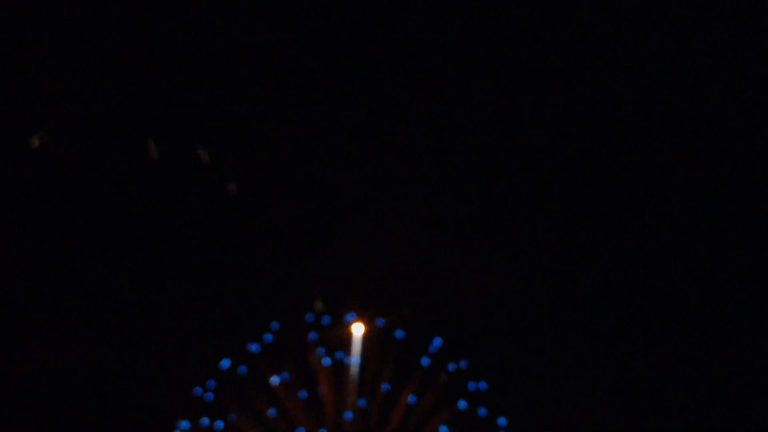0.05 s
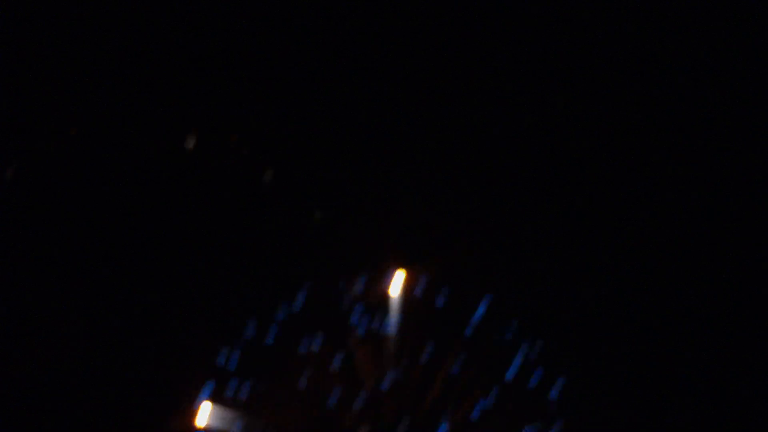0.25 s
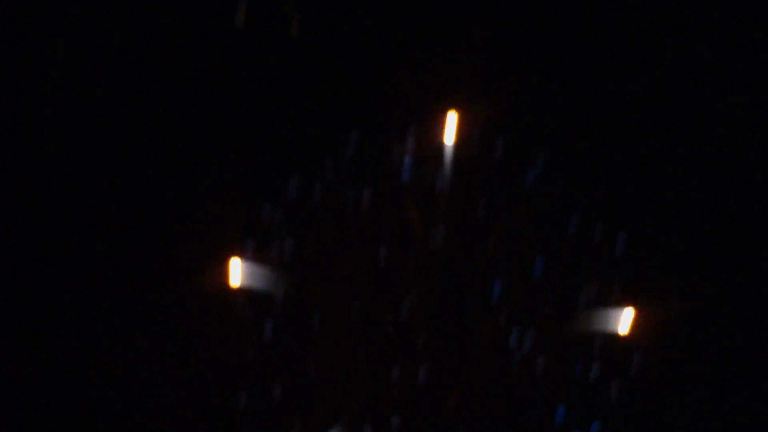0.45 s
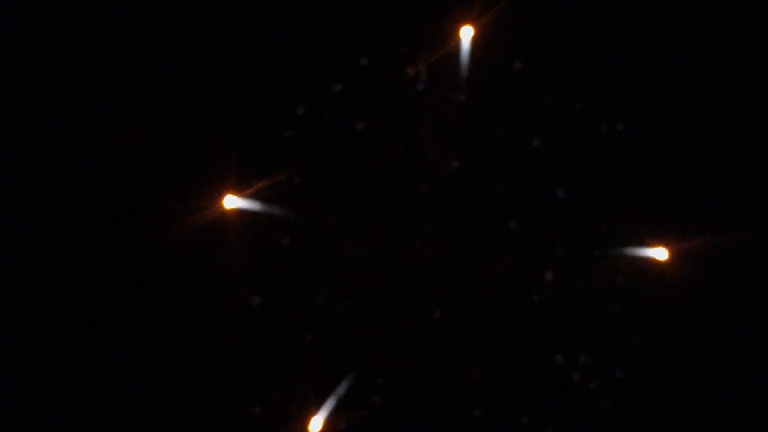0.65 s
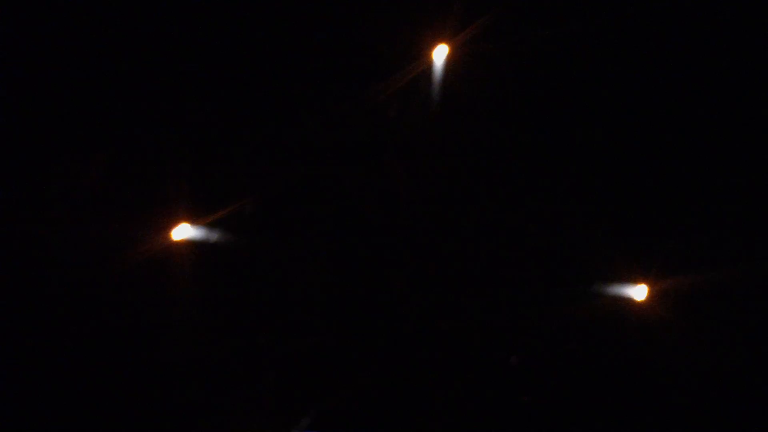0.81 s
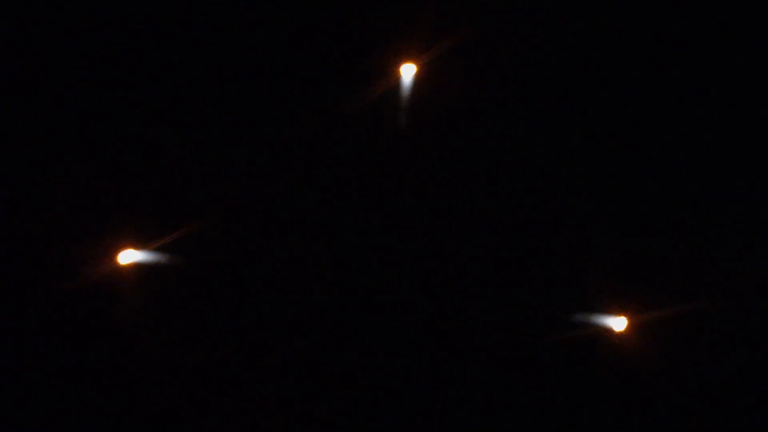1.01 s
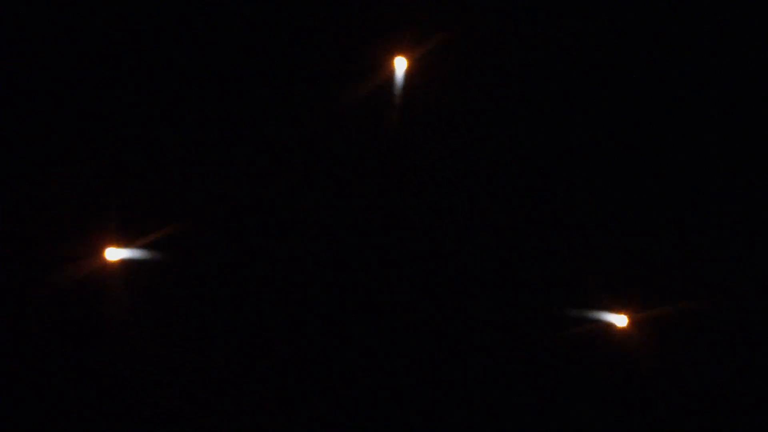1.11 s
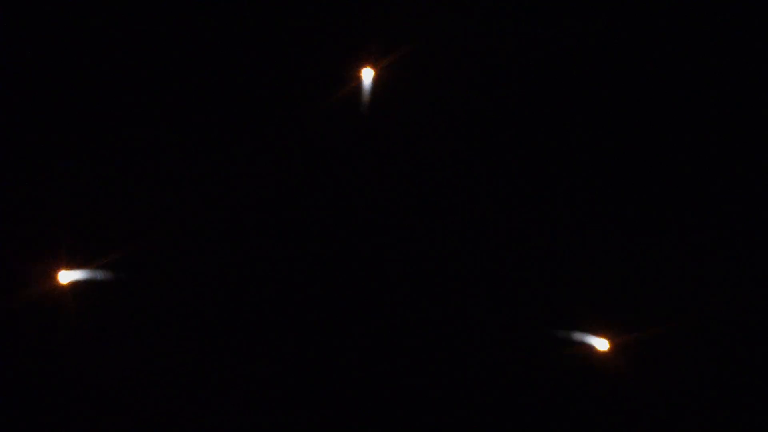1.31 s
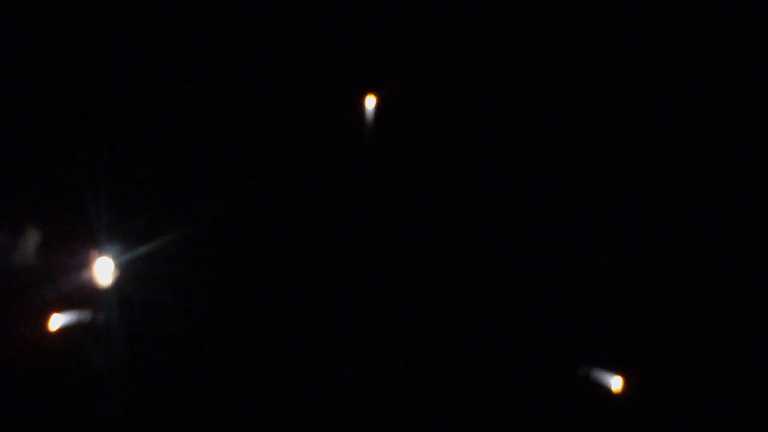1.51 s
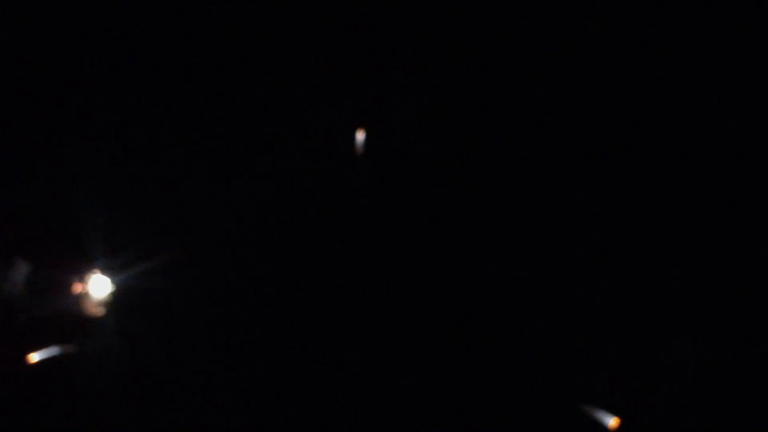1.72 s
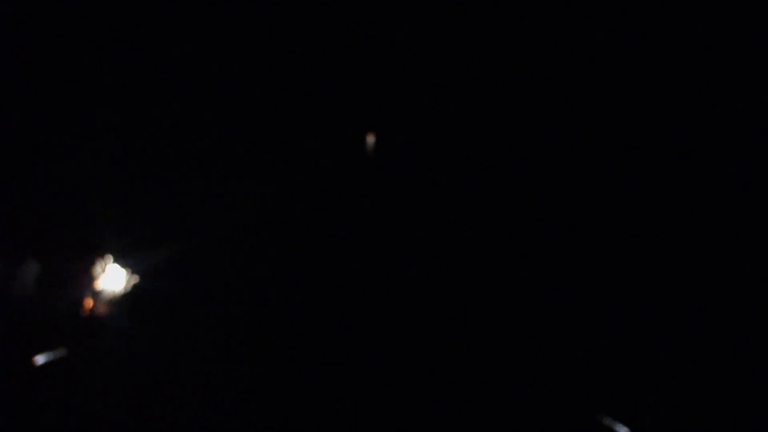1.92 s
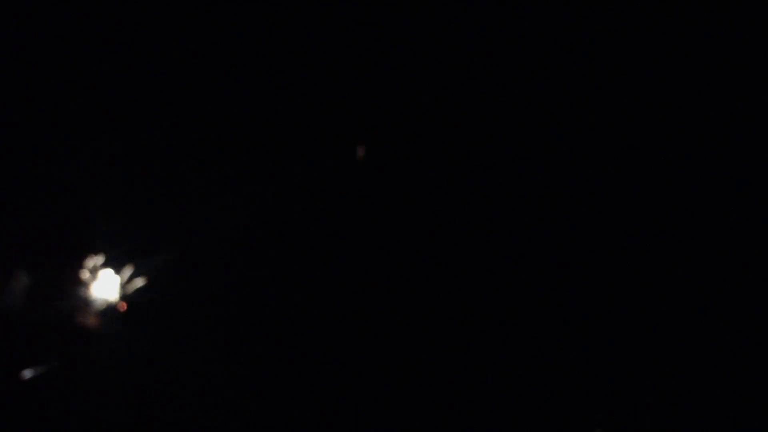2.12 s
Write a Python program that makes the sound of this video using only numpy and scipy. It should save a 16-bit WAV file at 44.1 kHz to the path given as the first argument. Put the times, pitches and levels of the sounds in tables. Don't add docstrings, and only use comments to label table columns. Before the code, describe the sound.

Over a faint fading rumble and thin early whistle, a firework bang slams a small camera microphone outdoors; clattering echoes thin out quickly, leaving overlapping shrill whistles, one buzzing, one wavering, drifting down in pitch.

```python
import sys
import numpy as np
from scipy import signal
from scipy.fft import rfft, irfft, next_fast_len
from scipy.io import wavfile
from scipy.ndimage import uniform_filter1d, map_coordinates

SR = 44100
rng = np.random.default_rng(int(sys.argv[2]) if len(sys.argv) > 2 else 0)


def voltage_ratio(level):
    return 10 ** (np.asarray(level, float) / 20)


def output_pcm(signal):
    pcm = np.clip(np.atleast_2d(signal).T, -1, 1) * 32767
    wavfile.write(sys.argv[1], SR, np.round(pcm).astype(np.int16))


N = 94815

# (time [s], strength [dB])
RETURNS = [
    (0.222, -20),
    (0.29, -18),
    (0.344, -19),
    (0.392, -21.5),
    (0.42, -18.5),
    (0.662, -27.5),
    (1.306, -33),
    (1.478, -37),
    (2.15, -39.5),
]


def unit(x):
    return x / np.sqrt(np.mean(x ** 2) + 1e-20)


def curves(rows):
    s, *cols = np.transpose(rows)
    return [np.interp(np.arange(N) / SR, s, c) for c in cols]


def wobble(rate):
    return map_coordinates(rng.standard_normal(N // 20), [np.arange(N) * rate / SR])


def filtered(x, response):
    m = next_fast_len(len(x) + 8192)
    return irfft(rfft(x, m) * response(np.fft.rfftfreq(m, 1 / SR)), m)[:len(x)]


def dulled(x, hz):
    return filtered(x, lambda f: 1 / (1 + 1j * f / hz) ** 2)


def rush(spectrum, patchy_db):
    z = signal.stft(rng.standard_normal(N), nperseg=512)[2]
    field = uniform_filter1d(rng.standard_normal(z.shape), size=6, axis=0)
    field = uniform_filter1d(field, size=6, axis=1)
    x = signal.istft(z * voltage_ratio(patchy_db * unit(field)), nperseg=512)[1][:N]
    f, db = np.transpose(spectrum)
    return unit(filtered(x, lambda hz: voltage_ratio(np.interp(np.log(hz + 1), np.log(f + 1), db, -120, -120))))


def blow(t, ms):
    u = t * 1000 / ms
    return (1 - u) * np.exp(-u * u / 3)


def night():
    # (frequency [Hz], level [dB per Hz])
    rumble = [(13, -41), (22, -4.5), (71, 3), (167, -27), (855, -19), (3980, -43.5), (5330, -23.5),
              (6480, -42.5), (7500, -69.5), (9750, -114), (16500, -120)]
    start_db, fade_db_per_s = -30.5, 8.5
    level_db = start_db - fade_db_per_s * np.arange(N) / SR + 0.33 * wobble(3.6)
    return voltage_ratio(level_db) * rush(rumble, patchy_db=4.0)


def whistle(rows, flutter_db, bend=0, pulse=1, side_db=0):
    hz, db = curves(rows)
    t = np.arange(N) / SR
    pitch_hz = hz * (1 + bend) + 12 * wobble(18) + 12 * wobble(160)
    turn = 2 * np.pi * np.cumsum(pitch_hz) / SR
    haze_db = -7 - 9 * np.clip(t / 1.3 - .5, 0, 1)
    tone = np.sin(turn) * (1 + voltage_ratio(haze_db) * wobble(900))
    undertone = voltage_ratio(-15) * np.sin(turn / 2)
    overtone = voltage_ratio(-14) * np.clip(t / 1.3, 0, 1) ** 2 * np.sin(turn * 3 / 2)
    tone += voltage_ratio(side_db) * (undertone + overtone)
    tone += voltage_ratio(-25 + 4.2 * wobble(2.9)) * np.sin(2 * turn)
    lit = uniform_filter1d(1. * ((t >= rows[0][0]) & (t <= rows[-1][0])), size=600)
    flutter = flutter_db * (0.5 - 1.44 * np.abs(wobble(21.93))) + 0.57 * wobble(140)
    return np.sqrt(2) * tone * pulse * lit * voltage_ratio(db + flutter)


def stars():
    # (time [s], pitch [Hz], level [dB])
    spinner = [(.36, 5930, -60), (.414, 5844, -41), (.592, 5687, -43), (.66, 5570, -57), (.78, 5370, -52),
               (.85, 5250, -44), (.95, 5150, -43), (1.144, 4815, -41), (1.36, 4429, -40), (1.6, 4145, -42),
               (1.74, 4010, -36), (1.86, 3890, -35.5), (1.95, 3815, -39), (2.15, 3715, -40)]
    tumbler = [(.56, 4660, -56), (.62, 4610, -49), (.68, 4530, -48), (.74, 4470, -41), (.9, 4320, -40),
               (1.0, 4220, -42), (1.2, 4030, -46), (1.33, 3900, -44), (1.4, 3740, -40), (1.6, 3730, -40),
               (1.8, 3645, -43), (2.0, 3555, -45), (2.15, 3490, -42)]
    lowest = [(.53, 4000, -50), (.58, 4135, -40), (.64, 4085, -46), (.67, 4045, -40), (.8, 4025, -42),
              (1.0, 3875, -42), (1.2, 3760, -40), (1.4, 3585, -43), (1.6, 3515, -42), (1.63, 3450, -52),
              (1.69, 3365, -46), (1.85, 3365, -45), (1.95, 3330, -49), (2.02, 3250, -45), (2.15, 3180, -43)]
    middle = [(.55, 4900, -60), (0.588, 4930, -42), (.66, 4940, -43), (0.766, 4830, -48), (.95, 4690, -49),
              (1.05, 4610, -46), (1.17, 4520, -45), (1.34, 4230, -52), (1.451, 4056, -58)]
    early = [(0.018, 5500, -61), (0.118, 5270, -50), (.25, 5230, -43.5), (0.333, 5103, -39.5),
             (0.402, 4893, -41.5), (0.481, 4830, -42), (0.559, 4590, -41.5), (0.601, 4540, -41.5)]
    brief = [
        (.37, 4700, -55),
        (.4, 4640, -39),
        (.46, 4570, -41),
        (.505, 4505, -34),
        (.53, 4480, -55),
    ]
    side_star = [
        (0.359, 5130, -59.5),
        (0.401, 5110, -49.5),
        (.52, 4900, -40.5),
        (.6, 5130, -71.5),
    ]
    high = [
        (0.038, 6130, -76),
        (0.116, 6200, -50.5),
        (0.22, 6090, -54.5),
        (.34, 6060, -43),
    ]
    split = [
        (1.621, 4155, -55),
        (1.66, 4233, -43),
        (1.697, 4187, -48.5),
        (1.761, 4010, -43),
    ]
    pip = [
        (1.385, 630, -60),
        (1.41, 620, -50),
        (1.44, 615, -60),
    ]
    facing = [.51, .63, .745, .86, .97, 1.065, 1.15, 1.24, 1.335, 1.415, 1.495, 1.59, 1.7, 1.82, 1.95, 2.09,
              2.24]
    # (frequency [Hz], level [dB per Hz])
    hiss = [(2500, -22.5), (3300, -16), (4200, -4.5), (4800, -10), (5800, -5), (6500, -10.5), (7200, -14.5),
            (7900, -42)]
    # (time [s], level [dB])
    hiss_swell = [
        (0, -58),
        (.15, -47.5),
        (.35, -38),
        (.9, -50.5),
        (1.4, -49.5),
        (2.15, -52.5),
    ]

    t = np.arange(N) / SR
    spin_hz, spin_depth = 62.5, .5
    spin = unit(1 + spin_depth * np.cos(2 * np.pi * spin_hz * t - 2.2 + .3 * wobble(5)))
    tumble = .015 * np.cos(2 * np.pi * np.interp(t, facing, np.arange(len(facing))))
    sputter = 40 / 4700
    worn = t > 1.62
    tones = whistle(spinner, 1.9, pulse=spin, side_db=-8)
    tones += whistle(tumbler, 2.4, bend=tumble)
    tones += sum(whistle(rows, 3.3, side_db=-7) for rows in (early, brief, side_star, high, split, pip))
    tones += whistle(lowest, 3.3, bend=worn * sputter * wobble(60), side_db=-7)
    tones += whistle(middle, 2.2, bend=sputter * wobble(110), side_db=-7)
    trail = rng.standard_normal(SR // 4) * np.exp(-np.arange(SR // 4) / SR / 0.12)
    tones += voltage_ratio(-18.5) * signal.fftconvolve(tones, trail / np.linalg.norm(trail))[:N]
    return tones + voltage_ratio(curves(hiss_swell)[0]) * rush(hiss, patchy_db=2.5)


def pops():
    count, thinning_s = 90, .3
    when, size = rng.exponential(1, (count, 2)).T
    at = np.minimum(((RETURNS[0][0] + thinning_s * when) * SR).astype(int), N - 1)
    level_db = -5 + 3 * np.minimum(size, 2.2) + curves(RETURNS)[0][at]
    ticks = np.bincount(at, voltage_ratio(level_db), N)
    shape = dulled(blow(np.arange(400) / SR, 0.17), 2400)
    return -signal.fftconvolve(ticks, shape)[:N]


def thumps():
    # (first trough [s], level [dB],
    # pitch [Hz], length [cycles])
    ground_and_hills = [(.2258, 2.5, 214, 0.4), (.2305, -9, 146, 0.65), (.2445, -27, 110, 0.88),
                        (0.2569, -6, 199, 0.58), (.2594, -1, 516, 0.47), (0.2635, -8.5, 500, 0.49),
                        (0.2673, -8, 199, 1.4), (0.276, -14, 150, 1.1), (0.3005, -19, 190, 0.36),
                        (0.318, -6, 178, 0.35), (0.3312, -18, 185, 1.4), (0.3368, -19.5, 156, 0.45),
                        (0.345, -9, 208, 0.2), (0.3585, -18, 200, 0.98), (.372, -16.5, 150, 0.68),
                        (0.4054, -13.5, 122, 0.69), (0.4264, -13, 143, 1), (0.4325, -18, 153, 0.59),
                        (0.4813, -11, 172, 0.47), (0.5175, -10.5, 100, 0.44), (0.5654, -18, 80, 1.36),
                        (.6068, -21, 900, 3.1), (0.8381, -18, 93, 0.73), (1.1489, -29, 150, .7)]
    # (time [s], level [dB], pitch [Hz], length [cycles])
    fences = [
        (.2383, -17, 1700, 2),
        (.259, -19, 6500, 8),
        (.2617, -15, 3100, 4),
        (.2622, -22, 7000, 5),
        (.3455, -19, 2300, 3),
        (.3585, -21, 2500, 3),
        (.3775, -20, 1400, 3),
        (.4205, -21, 2500, 4),
        (.44, -20, 2750, 5),
        (.493, -25, 2400, 4),
    ]
    s, db, hz, cycles = np.transpose(ground_and_hills + fences)[:, :, None]
    u = hz * (np.arange(N // 2 + N // 8) / SR - s) - .3
    swings = voltage_ratio(db - 1) * np.sin(2 * np.pi * u) * np.exp(-(u / cycles) ** 2)
    return np.pad(swings.sum(axis=0), (0, N - u.shape[1]))


def roll():
    # (frequency [Hz], level [dB per Hz])
    boom_colour = [(13, -44), (22, -7.5), (65, 5), (150, 4), (286, -9), (350, -48), (450, -10.5),
                   (580, -50), (990, -120)]
    clatter_colour = [(150, -31.5), (250, -7.5), (351, -8), (698, -8), (849, -4), (1400, -8.5), (1770, -18),
                      (2450, -17), (3400, -24), (4420, -54), (7480, -120)]
    strength_db, = curves(RETURNS)
    top = strength_db.max()
    below_top = strength_db - top
    build_s = .015
    on = np.clip((np.arange(N) / SR - RETURNS[0][0]) / build_s, 0, 1)
    boom = unit(voltage_ratio(1.3 * wobble(30.1)) * rush(boom_colour, patchy_db=0.96))
    boom *= voltage_ratio(-0.5 + 1.167 * below_top)
    grain_db = 0.93 * wobble(90) + 1.3 * wobble(44.0)
    clatter = unit(voltage_ratio(grain_db) * rush(clatter_colour, patchy_db=0.5))
    clatter *= voltage_ratio(-8 + 0.93 * below_top)
    return on * voltage_ratio(top) * (boom + clatter)


def burst():
    # (time [s], level [dB], push [ms], dulled above [Hz])
    shock = [
        (.2145, 18.5, 1.95, 4000),
        (.2174, 16.5, .42, 2100),
        (.2188, 7, .35, 2500),
        (.2195, 8, .42, 2200),
        (.2212, 1, .3, 2500),
        (.2218, -3, 1.6, 1500),
        (.2375, -10, .5, 3000),
    ]
    # (time [s], level [dB], dulled above [Hz], smear [ms])
    walls = [(0.2197, -1, 2970, 8.6), (0.258, -15, 7000, 4.5), (0.2615, -5, 3000, 4),
             (0.2645, -1, 1500, 12.6), (0.3434, -7, 7050, 4.4), (.3475, -15, 7080, 4.6),
             (.358, -10, 2960, 3.2), (.375, -15, 2500, 9.5), (0.42, -17, 2600, 6), (.438, -16, 3000, 6.6),
             (0.489, -21.5, 2500, 12), (.504, -27, 1500, 4), (0.605, -15, 2400, 3.3),
             (.794, -36, 1210, 7.1), (1.068, -31, 6100, 4.6), (1.201, -21, 1300, 14)]
    out, t = np.zeros(N), np.arange(SR // 10) / SR
    for s, db, ms, hz in shock:
        out[round(s * SR):][:len(t)] -= voltage_ratio(db) * dulled(blow(t, ms), hz)
    push = blow(t, 1.88)
    for s, db, hz, ms in walls:
        grit = rng.standard_normal(len(t)) * np.exp(-t * 1000 / ms)
        wall = signal.fftconvolve(grit / np.linalg.norm(grit), push)[:len(t)]
        echo = push + 0.38 * wall / np.abs(wall).max() + 0.45 * grit
        out[round(s * SR):][:len(t)] -= voltage_ratio(db) * dulled(echo, hz)
    return out


def scene():
    return (night() + stars() + pops() + thumps() + roll() + burst())[None]


def dropouts(x):
    hz, _, z = signal.stft(x, SR, nperseg=2048, noverlap=1024, window="cosine")
    power = np.abs(z) ** 2
    band = uniform_filter1d(power, size=5, axis=0)[2::5]
    chance_db = 5 * rng.standard_normal(band.shape)
    band = np.repeat(band * voltage_ratio(2 * chance_db), 5, axis=0)
    from_hz, top_hz = 1100, 6300
    around = uniform_filter1d(power, size=90, axis=0)
    weak = (band < around * voltage_ratio(2 * -14.5)) & (hz[:, None] > from_hz)
    treble = power[(hz > from_hz) & (hz < top_hz)].mean(axis=0)
    faint = (band < treble * voltage_ratio(2 * -15)) & (hz[:, None] > top_hz)
    z = z * ~(weak | faint)
    return signal.istft(z, SR, nperseg=2048, noverlap=1024, window="cosine")[1][:N]


def low_pass(x):
    return signal.sosfilt(signal.butter(12, 7950, fs=SR, output="sos"), x)


def record(dry):
    x = filtered(dry[0], lambda f: 1j * f / (45 + 1j * f))
    ceiling, top_hz = 1.04, 7300
    x = x / (1 + np.abs(x / ceiling) ** 6) ** (1 / 6)
    x = filtered(x, lambda f: 1 / np.sqrt(1 + (f / top_hz) ** 30))
    return low_pass(dropouts(x)[None])


dry = scene()
out = record(dry)
output_pcm(out)
```